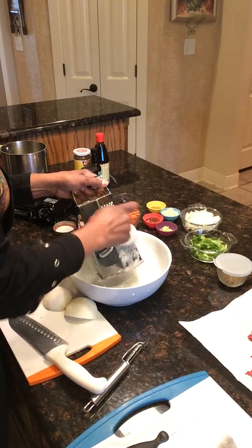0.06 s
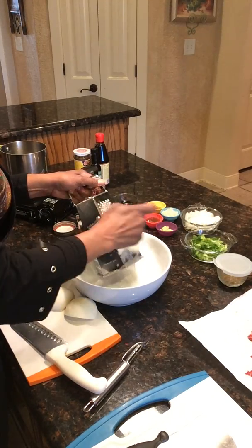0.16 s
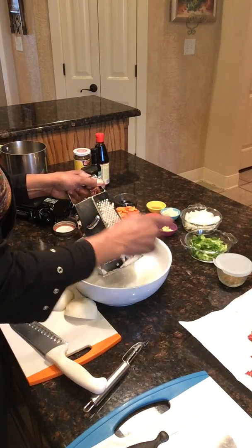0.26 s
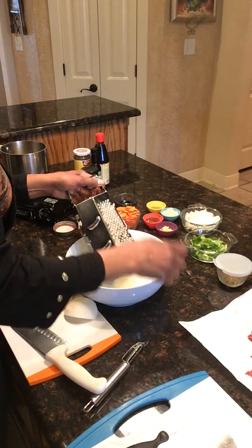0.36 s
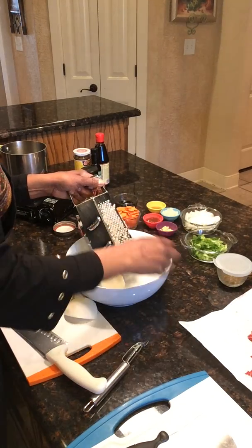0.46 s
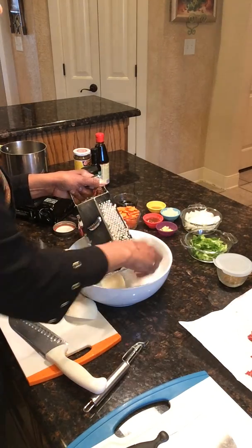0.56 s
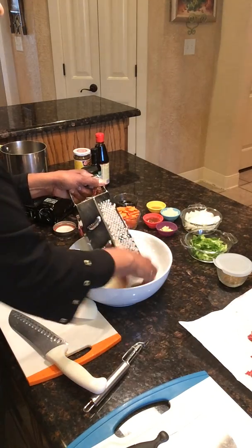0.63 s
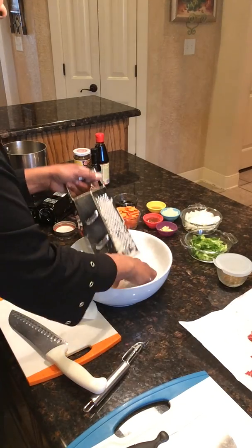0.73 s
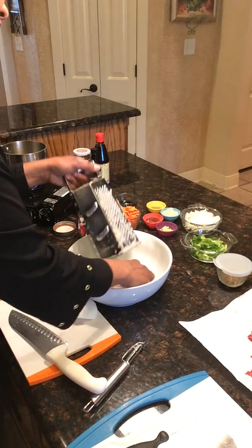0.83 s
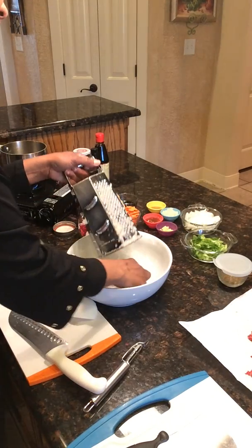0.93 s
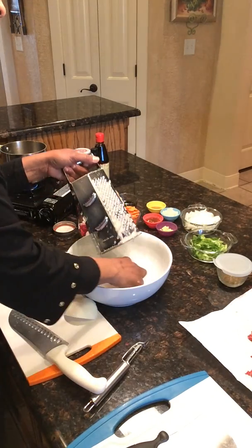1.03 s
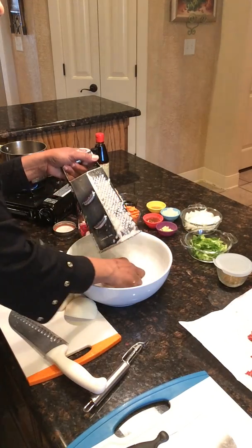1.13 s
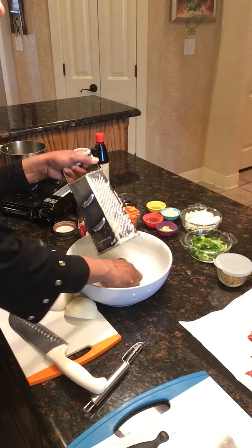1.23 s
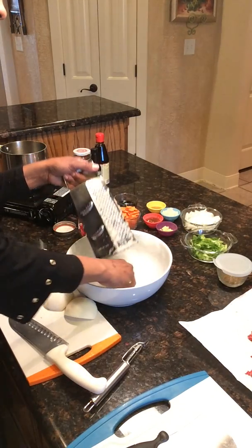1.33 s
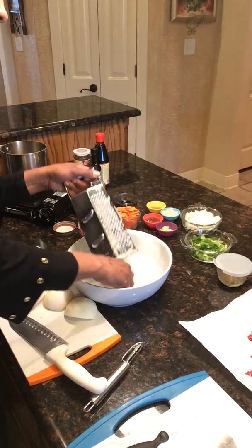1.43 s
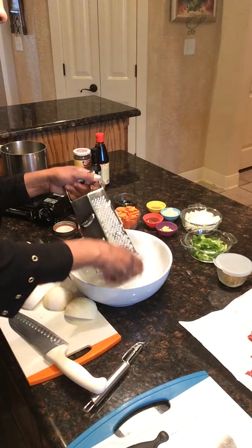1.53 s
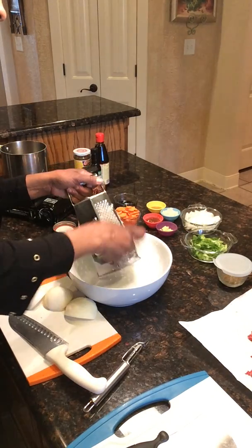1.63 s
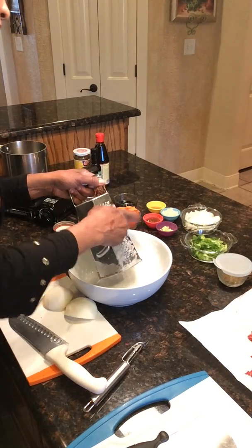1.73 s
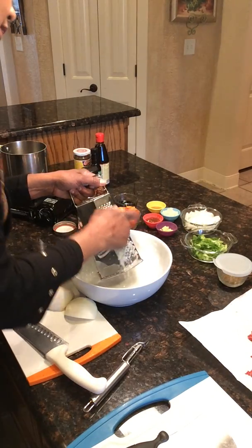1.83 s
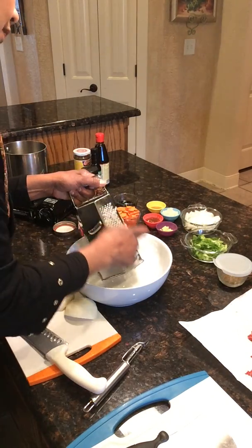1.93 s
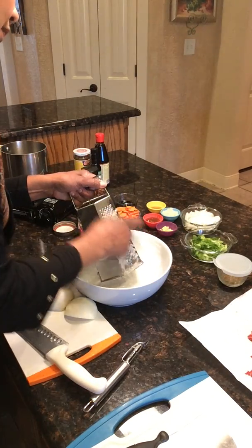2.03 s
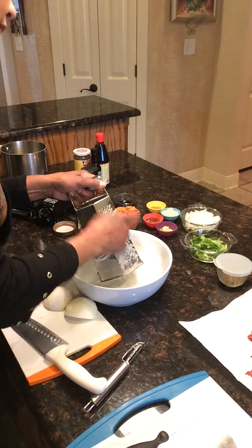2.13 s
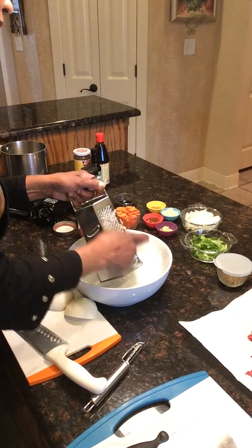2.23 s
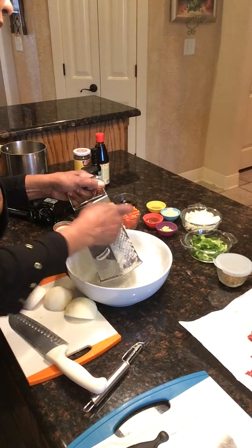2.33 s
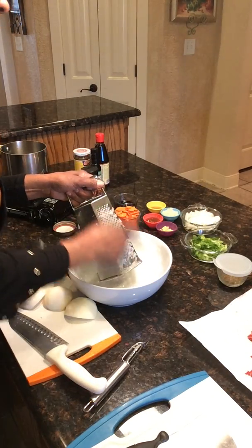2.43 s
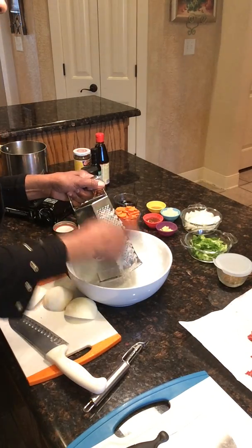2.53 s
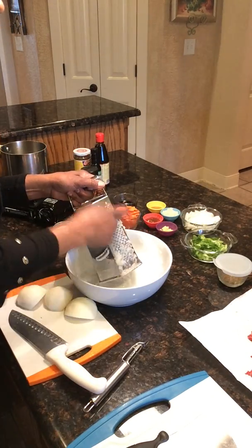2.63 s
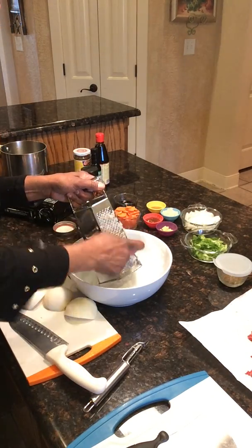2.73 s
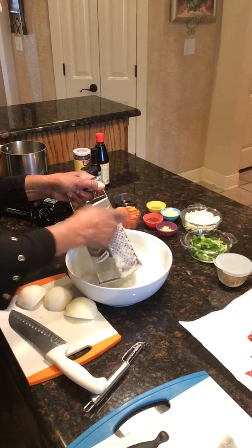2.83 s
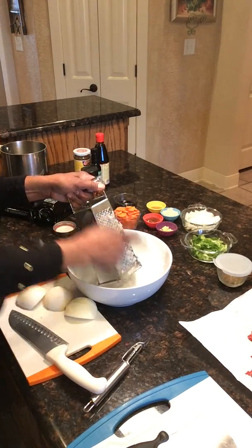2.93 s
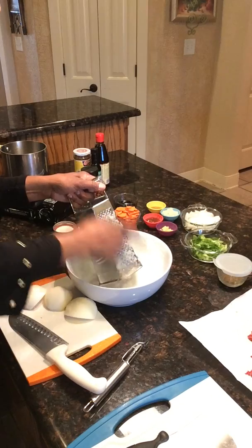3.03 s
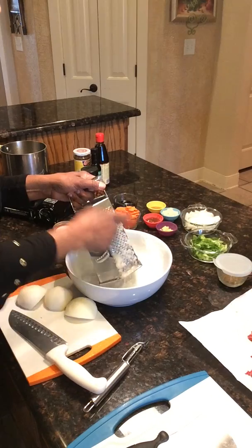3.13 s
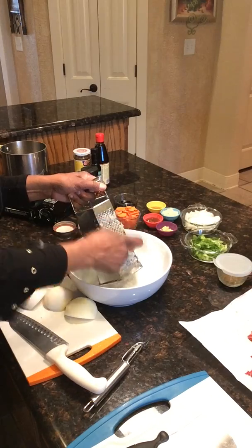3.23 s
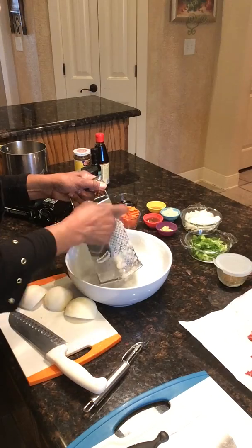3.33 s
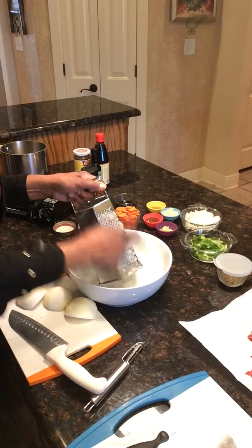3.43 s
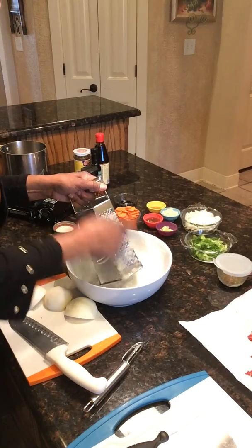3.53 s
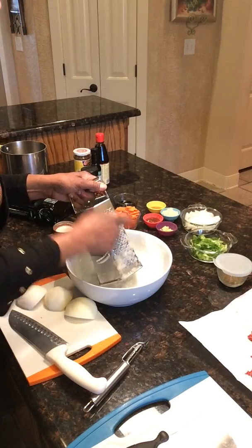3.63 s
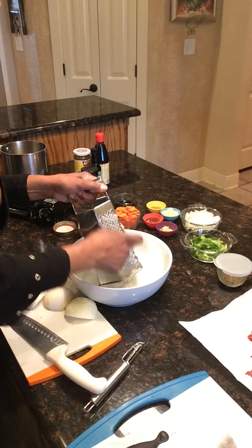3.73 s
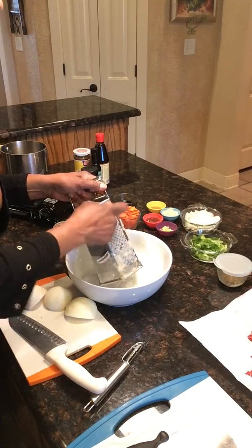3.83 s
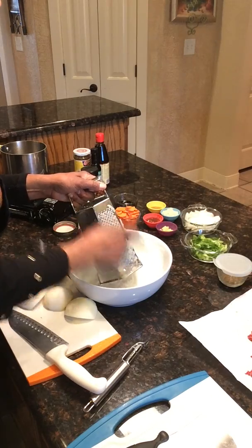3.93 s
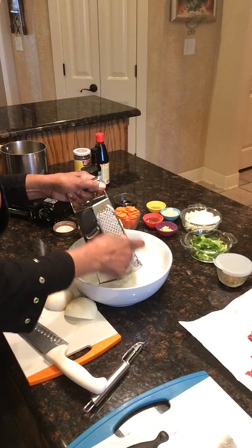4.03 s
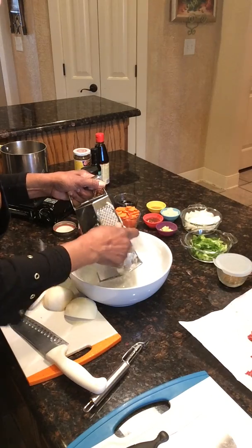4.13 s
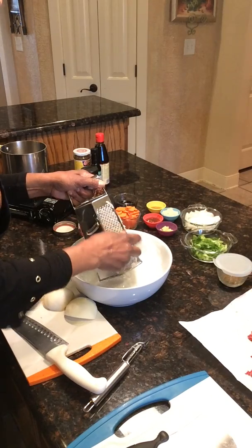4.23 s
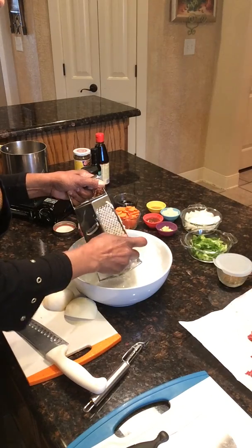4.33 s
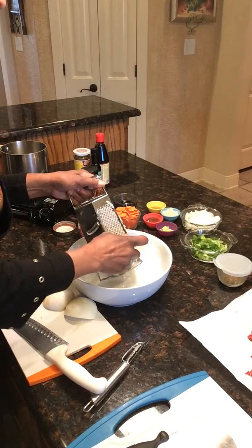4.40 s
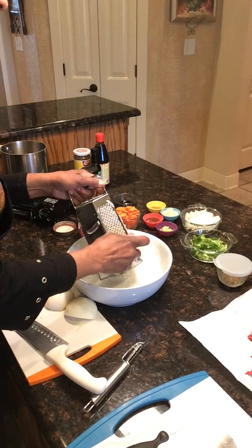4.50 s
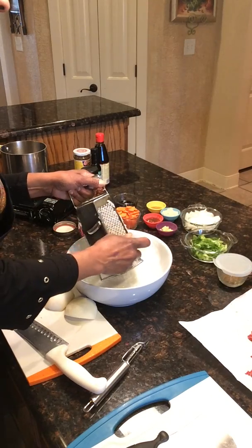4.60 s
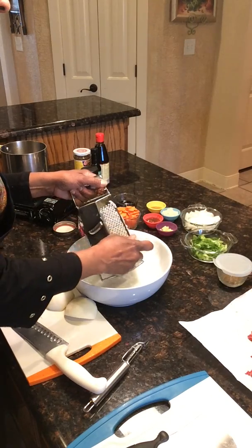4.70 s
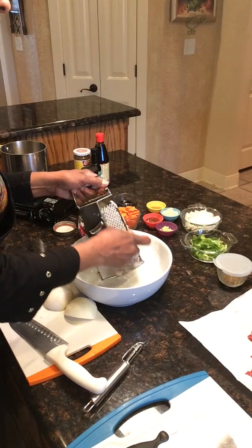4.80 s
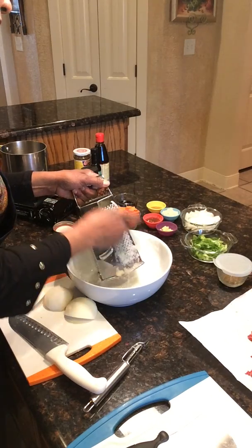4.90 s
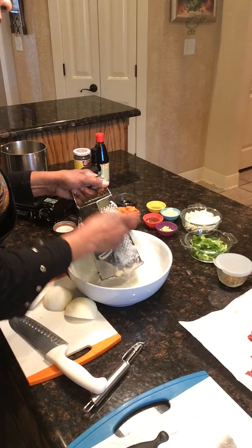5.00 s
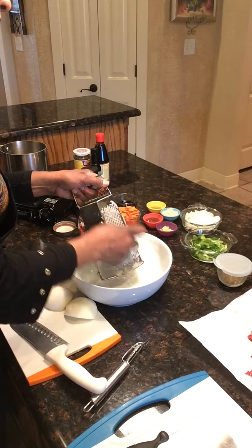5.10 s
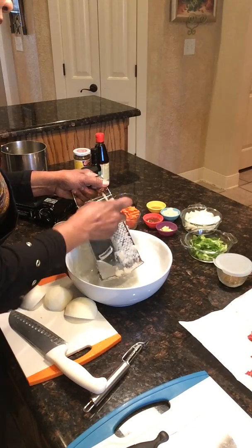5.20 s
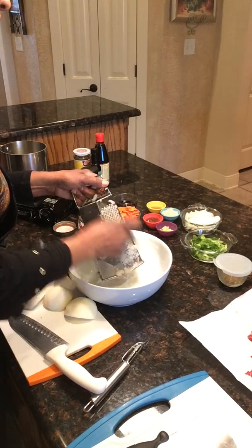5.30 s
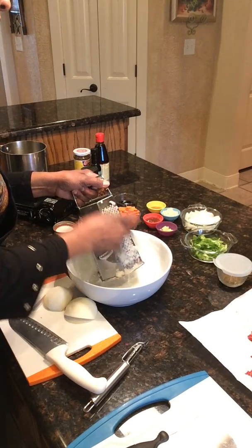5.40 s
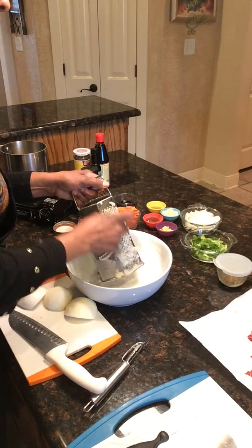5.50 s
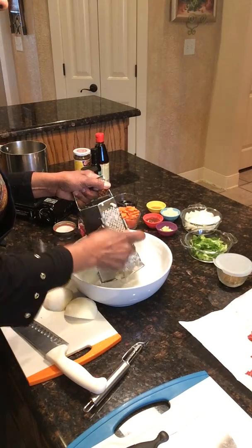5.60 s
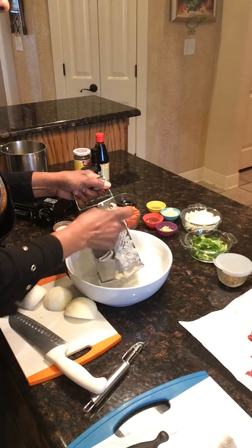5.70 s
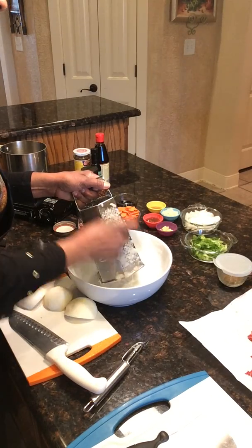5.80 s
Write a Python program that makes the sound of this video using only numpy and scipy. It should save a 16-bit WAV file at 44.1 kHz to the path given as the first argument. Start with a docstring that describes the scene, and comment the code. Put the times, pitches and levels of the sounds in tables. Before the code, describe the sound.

A metal grater knocks and clatters in a bowl, then two runs of fast, wet rasping follow in a small kitchen.

```python
"""Grating fruit into a bowl

Fruit is rubbed up and down a steel box grater that stands in a large bowl on a kitchen counter.
The grater is lifted out, knocks the bowl so that it rings, and is set down again. Then come two runs
of quick wet strokes, eight a second: the teeth tear the fruit in tiny snaps that shake the steel.
A small hard room and a faint low hum of air surround it all."""
import sys
import numpy as np
from scipy import signal
from scipy.io import wavfile

SR = 44100
rng = np.random.default_rng(int(sys.argv[2]) if len(sys.argv) > 2 else 0)


def master_out(mix):
    """Clip the mix to full scale and print it as 16-bit PCM to the path in sys.argv[1]."""
    frames = np.transpose(np.atleast_2d(mix))
    ceiling = np.clip(frames, -1, 1)
    pcm = np.round(ceiling * 32767).astype(np.int16)
    wavfile.write(sys.argv[1], SR, pcm)


N = 258117
TIME = np.arange(N) / SR

# The rush of the ventilation. Each row: frequency in Hz, relative level in dB.
AIR_TONE = [(15, -95), (25, -20.5), (204, -3.5), (421, -7), (523, -12), (762, -14), (945, -17), (1140, -16),
            (1240, -20), (1340, -17), (3090, -28), (15500, -51)]
# Its hum. Each row: pitch in Hz, level in dB.
HUM_NOTES = [(201, -69.5), (281, -71.5), (340, -73)]
# The room's echo. Each row: frequency in Hz, fade time in seconds (t60, the time to fall by 60 dB).
ROOM_FADE = [(100, 0.94), (500, 0.51), (2000, 0.51), (6000, 0.5), (15000, 0.33)]
# The grater's weight lands in the bowl. Each row: start in seconds, level of the boom in dB.
BOOMS = [(1.661, -55), (1.759, -53)]
# The notes of the bowl's rim. Each row: pitch in Hz, relative level in dB, fade time in seconds.
RIM_NOTES = [(1319, 1, 1.84), (3380, -2, 0.028), (4230, -26, 0.33), (7200, -26, 0.19)]
# Blows that make the rim sing. Each row: start in seconds, level in dB, change for the upper notes
# in dB, time in seconds of an extra fade caused by whatever rests in the bowl.
RIM_HITS = [(.440, -44.5, -14, 0.98), (0.537, -46, 6.5, 0.79), (.570, -56.5, -20, 9.8),
            (0.829, -46.5, -11, 0.39), (1.665, -37, -8, 0.49)]
# Steel or fruit squeaks. Each row: start and length in seconds, first and last pitch in Hz, level in dB.
SQUEAK_GLIDES = [(0.055, 0.0054, 765, 780, -47), (0.434, .016, 1556, 1163, -29.5),
                 (0.449, 0.019, 1037, 950, -36.5), (1.757, 0.015, 740, 720, -36),
                 (1.794, 0.021, 725, 898, -44), (2.166, 0.059, 702, 717, -50),
                 (5.451, 0.015, 737, 810, -50.5)]
# The grater hits the bowl. Each row: start in seconds, ring level in dB, hardness as a treble limit
# in Hz, fade time of the grip in seconds, crack level in dB, thump level in dB, number of rebounds.
GRATER_HITS = [(.103, -50, 6030, 0.26, -39.5, -52, 0), (.123, -40, 2600, 0.064, -45, -54, 0),
               (.236, -43.5, 1090, 0.34, -56, -61, 0), (.364, -67, 4000, .08, -57.5, -71, 0),
               (.369, -43.5, 640, 0.22, -82, -45.5, 0), (.435, -35.5, 1150, 0.057, -48, -47, 3),
               (.537, -57, 2200, .2, -54, -69, 0), (0.566, -60, 2400, .2, -59, -71, 0),
               (.787, -39.5, 1320, 0.28, -55.5, -64, 1), (.812, -43.5, 2000, 0.84, -59, -75, 3),
               (1.660, -29, 2000, 0.77, -43, -45.5, 0), (1.758, -36.5, 1980, .23, -46, -45, 1),
               (1.797, -39.5, 1100, 0.11, -57, -56, 1), (1.907, -61, 2000, 0.12, -61.5, -81, 0),
               (2.156, -66, 5000, .11, -58, -60, 0), (4.893, -49.5, 1570, .12, -61, -70, 0),
               (5.461, -58, 1120, 0.1, -54, -76, 0), (5.766, -67, 3500, 0.088, -51.5, -75, 0)]
# The grater's walls when struck. Each row: pitch in Hz, relative level in dB, fade time in seconds.
STEEL_NOTES = [(271, -12.5, 0.41), (403, -7, 0.41), (448.3, -4.5, 0.23), (521, -14, 0.23),
               (610, -11, 0.058), (689, 0.5, 0.12), (728.5, 5, 0.11), (734, -3, 0.04), (820, -12, 0.068),
               (951, -6.5, 0.6), (1040, -6.5, 0.16), (1138, -5.5, 0.1), (1114, -4, 0.36), (1284, -3, 0.16),
               (1410, -9, 0.18), (1540, -16, 0.067), (1596, -5.5, 0.16), (1731, -1.5, 0.11),
               (2067, -22, 0.14), (2190, -4, 0.068), (2350, -0.5, 0.068), (2525, -0.5, 0.047),
               (2650, -4, 0.12), (2920, -23, 0.055), (4430, -8, 0.12)]
# The short, dense clatter of a knock. Each row: frequency in Hz, relative level in dB.
CLATTER_TONE = [(30, -38), (100, -11), (350, -6), (700, 4), (1300, -1.5), (2000, 6), (2700, -6.5),
                (3100, 1), (6000, -34), (16000, -15)]
# The crack where steel meets bowl. Each row: frequency in Hz, relative level in dB.
CRACK_TONE = [(50, -32), (300, -66), (1500, 4.5), (3400, 1.5), (5000, -0.5), (7800, 1.5), (8600, 0),
              (15500, -5.5)]
# Fruit or pulp is pushed about, not grated. Each row: middle and length in seconds, level in dB.
PULP_SLIDES = [(0.02, 0.19, -58), (0.849, 0.12, -60.5), (1.48, .4, -68), (1.968, 0.19, -65),
               (4.186, 0.24, -68.5), (4.947, 0.24, -61.5)]
# Teeth tearing the fruit. Each row: frequency in Hz, relative level in dB.
RASP_TONE = [(25, -22.5), (75, 4.5), (200, -3.5), (450, -2.5), (900, -0.5), (2000, -0.5), (2800, -6),
             (3400, 1.5), (4500, 1), (6000, -1), (7900, -1.5), (8300, -5), (10500, -6), (15300, -8)]
# The steel sheet, damped by hand and fruit. Each row: pitch in Hz, width in Hz, relative level in dB.
SHEET_NOTES = [(1113, 29, 1), (1434, 166, 4.5), (1602, 85, 2.5), (1770, 110, 5.5), (2050, 110, -8),
               (2304, 61, 4), (2660, 113, -12.5), (4245, 40, 0)]
# The grater's hollow box. Each row: pitch in Hz, width in Hz, relative level in dB.
BOX_NOTES = [(445, 88, -14), (638, 35.4, 1), (719.6, 47, -0.5), (757, 38.5, 1), (939, 23, -14.5)]
# How deep the teeth bite; newly turned fruit skids at first. Each row: time in seconds, rasp change in dB.
BITE_DEPTH = [(0, -1), (2.05, -3.5), (2.2, -4.5), (2.45, -1), (2.57, -0.5), (5.1, 0), (5.85, -0.5)]
# The fruit goes down and up in turn. Each row: middle in seconds, force in dB, change for the box in dB.
FRUIT_STROKES = [(-.005, -52.5, 5), (0.059, -55, 2.5), (.17, -56, -1.5), (.26, -63, -4),
                 (2.06, -49.5, -2.5), (2.19, -50, -3.5), (2.326, -50.5, -3), (2.447, -51, -1.5),
                 (2.574, -46.5, -6.5), (2.704, -50.5, -2), (2.83, -47, -4), (2.944, -50, -8.5),
                 (3.073, -48, -4.5), (3.196, -50, -4), (3.319, -49, -5.5), (3.443, -51.5, -6),
                 (3.565, -49, -5), (3.689, -50, -4.5), (3.814, -48.5, -6.5), (3.941, -51, -5.5),
                 (4.069, -49, -5.5), (5.024, -53.5, -5), (5.176, -50.5, -3), (5.301, -50.5, -2.5),
                 (5.434, -48.5, -2.5), (5.552, -51, -10.5), (5.697, -52, -1), (5.815, -49.5, -5.5)]


def amp(db):
    """Turns decibels into a gain."""
    return 10 ** (np.asarray(db) / 20)


def unit(x):
    """Scales a signal to an average strength (rms) of one."""
    return x / np.sqrt(np.mean(x ** 2) + 1e-20)


def unit_start(x, size=512):
    """Scales a blow so that its first samples have an average strength of one."""
    return x / np.sqrt(np.mean(x[:size] ** 2) + 1e-20)


def read(points, hz):
    """Looks up a value between table rows, on a scale of octaves."""
    row_hz, value = np.transpose(points)
    return np.interp(np.log(hz + 1), np.log(row_hz + 1), value)


def add(mix, start_s, sound):
    """Mixes a sound in at the given time."""
    part = mix[max(0, round(start_s * SR)):][:len(sound)]
    part += sound[:len(part)]


def fading(t, t60):
    """A fade of 60 dB every t60 seconds."""
    return np.exp(-np.log(1000) * t / t60)


def burst(t60):
    """Noise that starts at once and dies away."""
    return rng.standard_normal(SR // 4) * fading(TIME[:SR // 4], t60)


def soften(x, hz):
    """Turns down everything above hz."""
    return signal.lfilter(*signal.butter(2, min(hz, SR / 3), fs=SR), x)


def band(x, low_hz, high_hz):
    """Keeps what lies between two frequencies."""
    return signal.sosfilt(signal.butter(3, [low_hz, high_hz], "bandpass", fs=SR, output="sos"), x)


def colour(x, tone, size=2048):
    """Gives a sound the tone in a table while keeping its clicks sharp."""
    hz = abs(np.fft.fftfreq(size, 1 / SR))
    log_gain = np.log(amp(read(tone, hz)))
    taps = np.fft.ifft(np.exp(np.conj(signal.hilbert(log_gain)))).real  # rings only after a click
    return signal.oaconvolve(x, taps)[:len(x)]


def resonate(x, notes):
    """Lets a sound ring at the given notes, neighbours swinging in opposite directions."""
    return sum((-1) ** k * amp(db) * signal.lfilter(*signal.iirpeak(hz, hz / width, SR), x)
               for k, (hz, width, db) in enumerate(notes))


def drift(hz):
    """A smooth random curve that wanders no faster than about hz."""
    knots = np.arange(0, N, 64)
    curve = unit(soften(rng.standard_normal(len(knots)), hz * 64))
    return np.interp(np.arange(N), knots, curve)


def air(rush_db=-61.4, hum_width_hz=9):
    """Ventilation makes a steady low rush with a few blurred tones."""
    rush = amp(rush_db) * unit(colour(rng.standard_normal(N), AIR_TONE, size=8192))
    hum = sum(amp(db) * unit(resonate(rng.standard_normal(N), [(hz, hum_width_hz, 0)]))
              for hz, db in HUM_NOTES)
    return rush + hum


def kitchen(x, delay_s=0.004, echoes_per_s=3000):
    """Sound bounces off counter, doors and walls; the low echoes last longest."""
    echoes = rng.standard_normal(SR) * (rng.random(SR) < echoes_per_s / SR)
    hz, t, bands = signal.stft(echoes, SR, nperseg=256)
    tail = signal.istft(bands * fading(t, read(ROOM_FADE, hz)[:, None]), SR, nperseg=256)[1]
    tail = np.r_[np.zeros(round(delay_s * SR)), tail]
    return signal.fftconvolve(x, tail / np.linalg.norm(tail))[:N]


def counter():
    """The stone top answers a heavy blow with a short, deep boom."""
    out = np.zeros(N)
    for start, db in BOOMS:
        boom = band(burst(t60=0.095), low_hz=50, high_hz=130)
        add(out, start, amp(db) * unit_start(boom, size=1500))
    return out


def bowl(rise_s=0.0023):
    """The rim sings on after hard blows; each note follows the blow that leaves it swinging most."""
    out = np.zeros(N)
    for k, (hz, note_db, t60) in enumerate(RIM_NOTES):
        swing = np.zeros(N)
        for start, db, upper_db, damping_t60 in RIM_HITS:
            age = np.maximum(TIME - start, 0)
            height = amp(db + note_db + upper_db * (k > 0))
            rise = 1 - np.exp(-age / rise_s)
            swing = np.maximum(swing, height * rise * fading(age, t60) * fading(age, damping_t60))
        out += np.sqrt(2) * swing * np.sin(2 * np.pi * hz * TIME)
    return out


def squeaks(wobble=0.11, octave_db=-23):
    """Steel or fruit sticks and slips, making a short, shaky tone that glides."""
    out = np.zeros(N)
    for start, length, first_hz, last_hz, db in SQUEAK_GLIDES:
        count = round(length * SR)
        shake = unit(soften(rng.standard_normal(SR // 10), hz=250))[-count:]
        hz = np.linspace(first_hz, last_hz, count) * (1 + wobble * shake)
        phase = 2 * np.pi * np.cumsum(hz) / SR
        tone = np.sin(phase) + amp(octave_db) * np.sin(2 * phase)
        add(out, start, amp(db) * unit(tone * signal.windows.tukey(count, 0.5)))
    return out


def steel_ring(scatter_db=0.4):
    """The struck walls ring; each blow lands elsewhere, so the mix of notes varies by chance."""
    t = TIME[:SR // 4]
    chance = rng.standard_normal((len(STEEL_NOTES), 2))
    return sum(np.sign(side) * amp(db + scatter_db * luck) * fading(t, t60) * np.sin(2 * np.pi * hz * t)
               for (hz, db, t60), (luck, side) in zip(STEEL_NOTES, chance))


def knock(ring_db, hardness_hz, grip_t60, crack_db, thump_db, clatter_db=-3):
    """Steel meets bowl: a crack, walls that ring until the grip stills them, a thump in the counter."""
    ring = unit_start(steel_ring())
    clatter = amp(clatter_db) * unit_start(colour(burst(t60=0.096), CLATTER_TONE))
    held = (ring + clatter) * fading(TIME[:len(ring)], grip_t60)
    steel = unit_start(soften(held, hardness_hz))
    dullness = np.exp(-2 * np.pi * 2.6 * hardness_hz / SR)  # a harder hit makes a brighter crack
    crack = colour(burst(t60=0.064), CRACK_TONE)
    crack = unit_start(signal.lfilter([1], [1, -dullness], crack), size=256)
    thump = unit_start(band(burst(t60=0.065), low_hz=100, high_hz=320), size=900)
    return amp(ring_db) * steel + amp(crack_db) * crack + amp(thump_db) * thump


def knocks(gap_s=0.0135, rebound_db=-5, step_db=-1.5):
    """The loosely held grater hits the bowl, sometimes chattering in ever weaker rebounds."""
    out = np.zeros(N)
    for start, *contact, rebounds in GRATER_HITS:
        add(out, start, knock(*contact))
        for k in range(rebounds):
            add(out, start + (k + 1) * gap_s, amp(rebound_db + k * step_db) * knock(*contact))
    return out


def snaps(per_s, spread_db):
    """Fruit cells burst in a dense stream of clicks; spread_db makes their sizes uneven."""
    size = amp(spread_db * np.minimum(rng.exponential(1, N), 4))
    return unit(size * rng.choice([-1, 1], N) * (rng.random(N) < per_s / SR))


def sliding(sheet_db=-6, fingers_db=-75):
    """Wet pulp crackles in soft swells, under fingers that never quite keep still."""
    crackle = snaps(per_s=3500, spread_db=0)
    sound = unit(colour(crackle, RASP_TONE)) + amp(sheet_db) * unit(resonate(crackle, SHEET_NOTES))
    swells = sum(amp(db) * np.cos(np.pi * np.clip((TIME - middle) / length, -0.5, 0.5)) ** 2
                 for middle, length, db in PULP_SLIDES)
    return sound * np.hypot(swells, amp(fingers_db))


def gliding_notes(x, notes, pitch_factor, wander_db=2):
    """The grater's notes bend in pitch and waver in level as the fruit crosses the wall."""
    clock = np.cumsum(pitch_factor) / SR  # time runs faster for a higher pitch
    out = np.zeros(N)
    for k, (hz, width, db) in enumerate(notes):
        spin = np.exp(2j * np.pi * hz * clock)
        decay = np.exp(-np.pi * width / SR)
        ringing = (spin * signal.lfilter([1 - decay], [1, -decay], x * spin.conj())).real
        out += (-1) ** k * amp(db + wander_db * drift(hz=9)) * ringing
    return unit(out)


def hand_motion(reach_s=0.08, turn_db=-14):
    """Each stroke speeds up and slows. Gives the effort, the push on the box and the fruit's place."""
    effort, box_push, place = np.zeros((3, N))
    # a stroke reaches halfway to its neighbour, but at most reach_s from its own middle
    half_gaps = np.diff([row[0] for row in FRUIT_STROKES]) / 2
    reach = np.r_[reach_s, np.minimum(half_gaps, reach_s), reach_s]
    for k, (middle, force_db, hollow_db) in enumerate(FRUIT_STROKES):
        start, end = middle - reach[k], middle + reach[k + 1]
        now = (TIME >= start) & (TIME < end)
        travel = np.interp(TIME[now], [start, middle, end], [0, 0.5, 1])
        speed = abs(np.sin(np.pi * travel)) ** 0.82
        effort[now] = amp(force_db) * np.hypot(speed, amp(turn_db))
        box_push[now] = amp(hollow_db) * effort[now] * speed ** 0.36
        place[now] = 1 - travel if k % 2 else travel
    return effort, box_push, place


def grating(catch_db=0.68, rasp_db=1, fizz_db=-0.1, sheet_db=-4, box_db=-0.96, fizz_hz=8000, bend=0.042):
    """The teeth tear the fruit with a rasp and a wet fizz, shaking the steel sheet and the hollow box."""
    effort, box_push, place = hand_motion()
    # rows of teeth catch and let go, so the snaps come in clumps
    catching = amp(catch_db * unit(soften(rng.standard_normal(N), hz=87)))
    teeth = unit(snaps(per_s=9000, spread_db=1.5) * catching)
    flesh = unit(colour(teeth, RASP_TONE))
    rasp = signal.sosfiltfilt(signal.butter(3, fizz_hz, fs=SR, output="sos"), flesh)
    fizz = flesh - rasp
    bite_db = np.interp(TIME, *np.transpose(BITE_DEPTH))  # skidding weakens the rasp, not the fizz
    tearing = amp(rasp_db + bite_db) * rasp + amp(fizz_db) * fizz
    pitch_factor = 1 + bend * (2 * place - 1)  # the moving fruit loads the wall and shifts its notes
    sheet = amp(sheet_db) * gliding_notes(teeth, SHEET_NOTES, pitch_factor)
    box = amp(box_db) * gliding_notes(teeth, BOX_NOTES, pitch_factor)
    return effort * (tearing + sheet) + box_push * box


def scene(rubbing_echo_db=-10.5, blows_echo_db=-8):
    """Grater and bowl at arm's length in the kitchen."""
    rubbing = grating() + sliding()
    blows = knocks() + squeaks()
    echoes = kitchen(amp(rubbing_echo_db) * rubbing + amp(blows_echo_db) * blows)
    return (rubbing + blows + bowl() + counter() + echoes + air())[None]


def record(dry, low_hz=34, high_hz=15450):
    """Trims away the deepest bass and the highest treble."""
    thinned = signal.lfilter(*signal.butter(2, low_hz, "highpass", fs=SR), dry)
    treble_cut = signal.firwin(801, high_hz, window=("kaiser", 8), fs=SR)
    return signal.oaconvolve(thinned, treble_cut[None], "same")


dry = scene()
out = record(dry)
master_out(out)
```